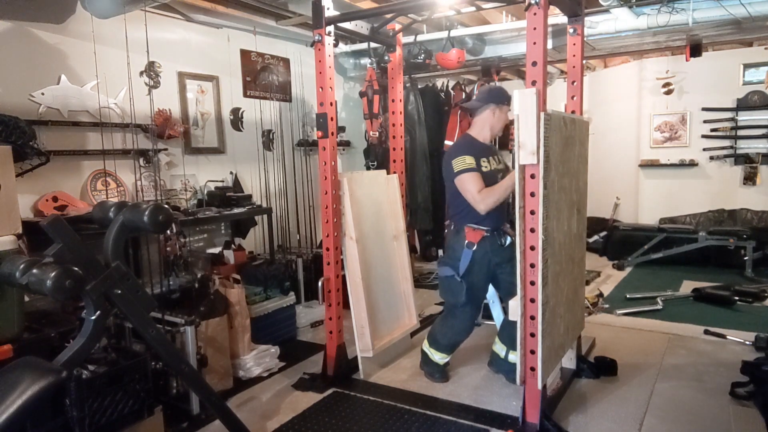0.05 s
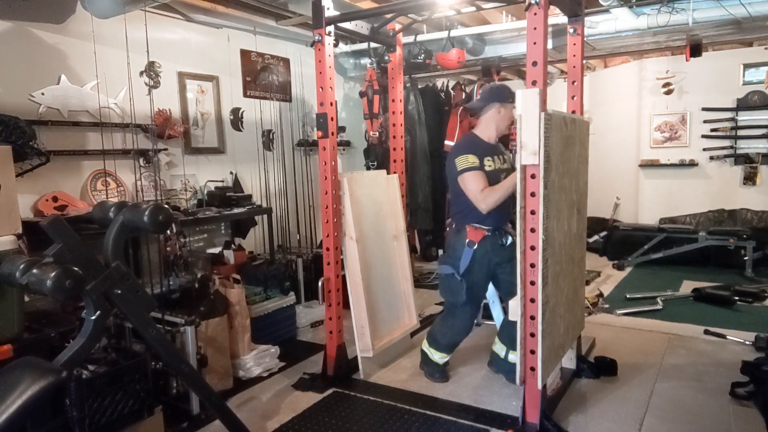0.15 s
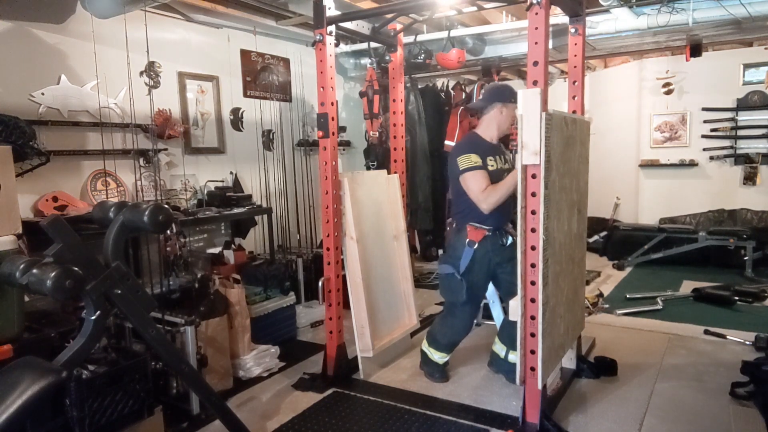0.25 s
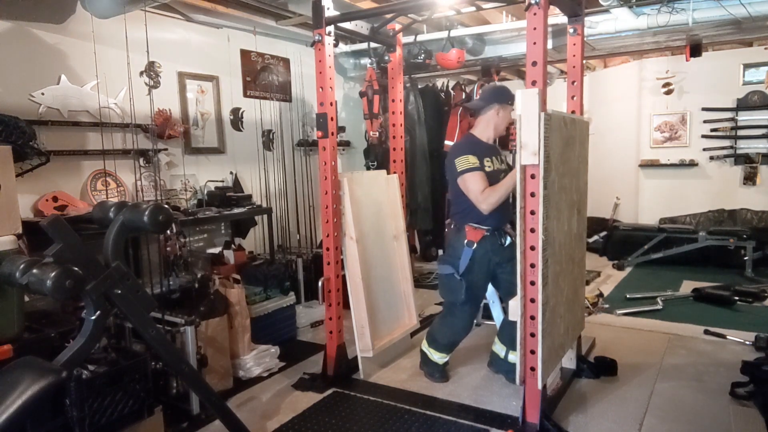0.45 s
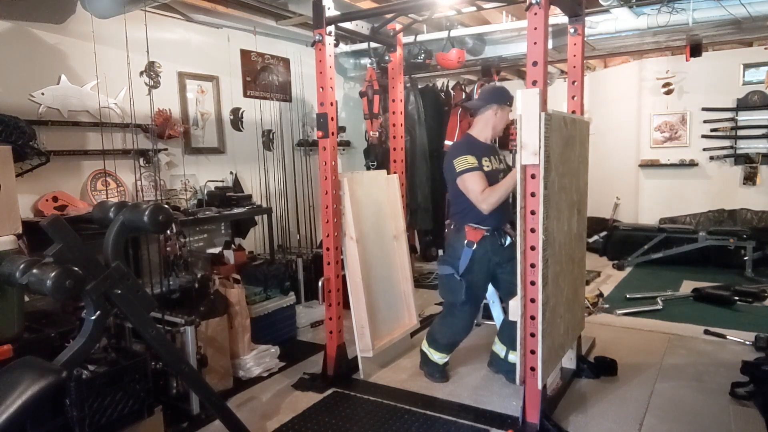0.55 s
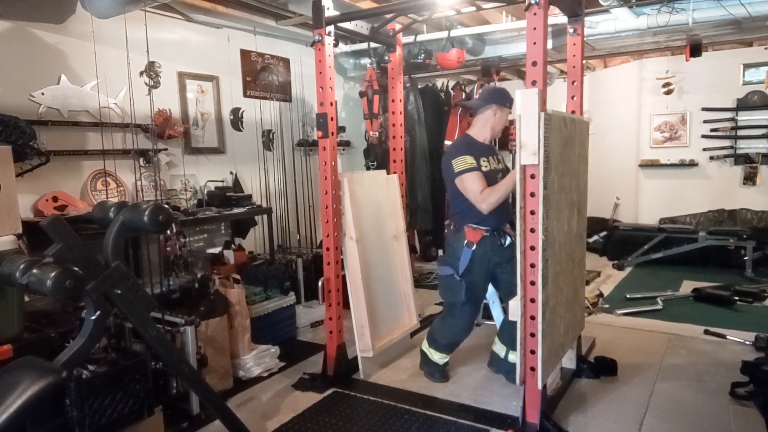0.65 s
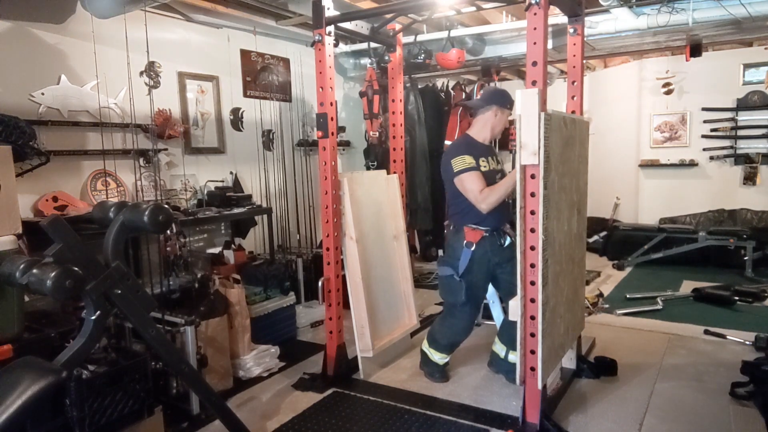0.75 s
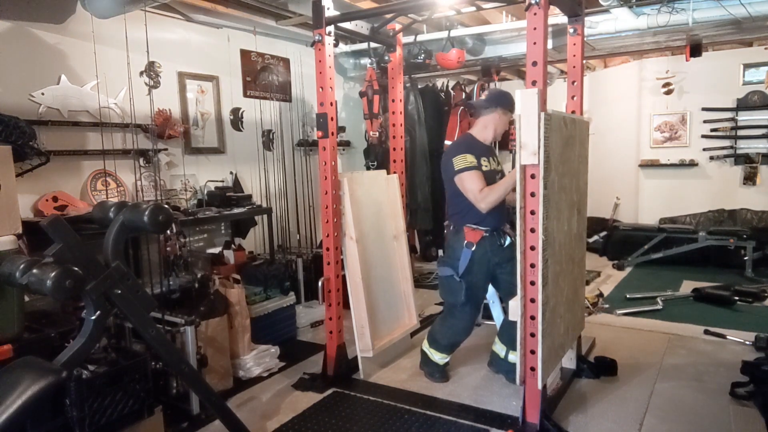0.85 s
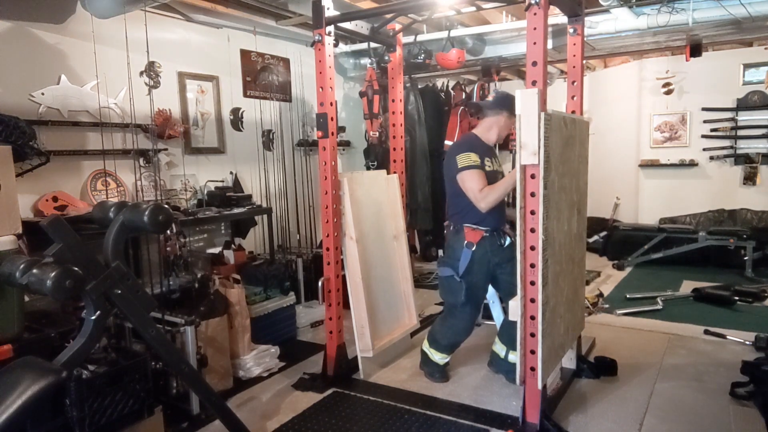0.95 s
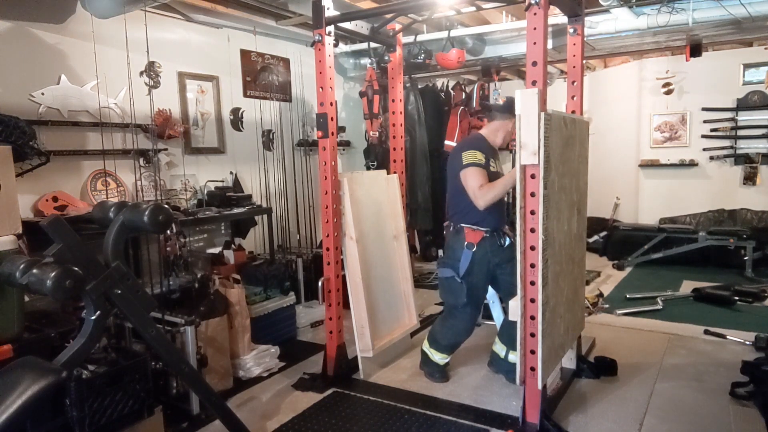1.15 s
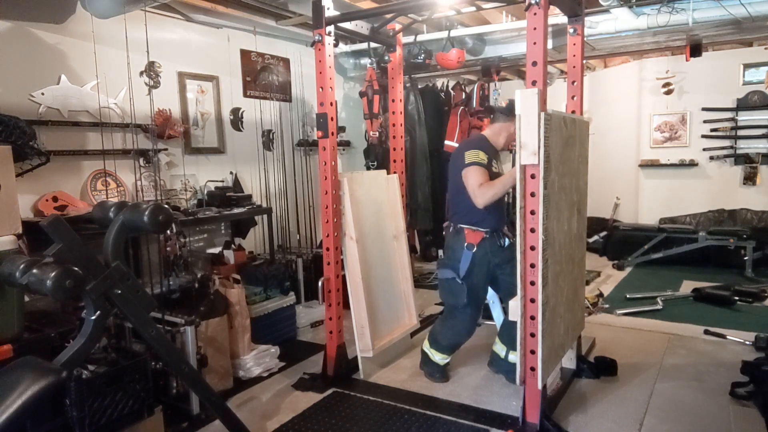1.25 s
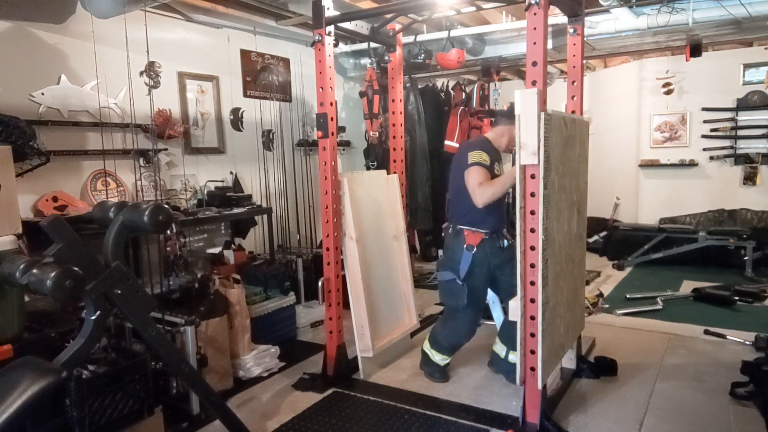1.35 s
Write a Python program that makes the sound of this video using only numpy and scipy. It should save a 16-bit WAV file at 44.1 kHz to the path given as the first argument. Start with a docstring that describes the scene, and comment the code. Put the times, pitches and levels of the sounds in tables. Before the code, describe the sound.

A wooden panel slams against a steel rack at about 0.2 seconds, a sharp crack with a short garage echo and a low floor thud, just after a faint swish of clothing. A soft bump follows at 0.4 seconds and a weaker, metallic knock near 0.6 seconds. A thin ring of loose steel then fades over faint shuffling and room noise until about 1.4 seconds.

```python
"""A wooden panel is shoved against a steel rack in a garage: it grazes, slams, bumps softly and knocks again.
Each impact excites dense, short-lived modes, heard as a crack that reverberation prolongs, and rings
the lower modes of the panel and the rack's upright. A loose steel part sings on near 1.4 kHz,
the floor thuds under shifting weight, and clothes and feet swish over faint room noise."""
import sys
import numpy as np
from scipy import signal
from scipy.fft import rfft, irfft, next_fast_len
from scipy.io import wavfile

SR = 44100
rng = np.random.default_rng(int(sys.argv[2]) if len(sys.argv) > 2 else 0)


def store_pcm(level_fs):
    """Save levels as 16-bit WAV."""
    pcm = np.round(np.clip(level_fs, -1, 1) * 32767).astype(np.int16)
    wavfile.write(sys.argv[1], SR, np.atleast_2d(pcm).T)


N = 61739
T = np.arange(N) / SR

# correlation of the two channels: frequency_hz, correlation
COHERENCE = [(150, .98), (260, 0.9), (500, .55), (1000, 0.2), (4000, 0.12), (9000, -.15)]


def amp(db):
    """Amplitude ratio of a level in decibels."""
    return 10 ** (np.asarray(db) / 20)


def curve_at(points, hz):
    """Interpolation of a table on a logarithmic frequency axis."""
    frequency, value = np.transpose(points)
    return np.interp(np.log(hz + 1), np.log(frequency + 1), value)


def add(mix, start_s, sound):
    """Superposition: a sound joins the mix at start_s."""
    part = mix[:, round(start_s * SR):]
    part += sound[:, :part.shape[1]]


def coloured(x, gain):
    """Minimum-phase filtering: a causal response of unit energy, shaped like gain(hz)."""
    size = 4096
    log_gain = np.log(gain(abs(np.fft.fftfreq(size, 1 / SR))) + 1e-5)
    response = np.exp(signal.hilbert(log_gain).conj())
    taps = np.fft.ifft(response).real[:size // 2]
    return signal.oaconvolve(x, taps[None] / np.linalg.norm(taps), axes=1)[:, :N]


def diffuse_noise(gain):
    """A diffuse field is coherent only in the bass: stereo noise of rms 1, shaped like gain(hz)."""
    size = next_fast_len(N, True)
    hz = np.fft.rfftfreq(size, 1 / SR)
    mid, side = rfft(rng.standard_normal((2, size)))
    coherence = np.clip(curve_at(COHERENCE, hz), -1, 1)
    mid, side = mid * np.sqrt(1 + coherence), side * np.sqrt(1 - coherence)
    noise = irfft(np.array([mid + side, mid - side]) * gain(hz), size)[:, :N]
    return noise / np.sqrt(np.mean(noise ** 2) + 1e-20)


def ring_modes(modes, strikes, swell_cycles=2.5, waver_depth=0.35, lag_rad=None):
    """Damped modes sum the energy of their strikes; they swell to fill the room and reflections waver them."""
    waver_hz = 24.18
    out = np.zeros((2, N))
    for hz, level_db, t60_s in modes:
        swell = 1 - np.exp(-T * hz / swell_cycles)
        envelope = (swell * amp(level_db - 60 * T / t60_s))[None]
        energy = np.zeros((1, N))
        for start_s, strike_db, treble_cut_hz in strikes:
            add(energy, start_s, (amp(strike_db) * envelope) ** 2 / (1 + (hz / treble_cut_hz) ** 6))
        coherence = np.clip(curve_at(COHERENCE, hz), -1, 1)
        lag = np.arccos(coherence) * rng.choice([-1, 1]) if lag_rad is None else lag_rad
        drift = rng.standard_normal((2, 128)) + 1j * rng.standard_normal((2, 128))
        drift[1] = coherence * drift[0] + np.sqrt(1 - coherence ** 2) * drift[1]
        waver = np.array([np.interp(T * waver_hz, np.arange(len(d)), d) for d in drift])
        tone = np.exp(2j * np.pi * (hz * T + rng.random()))
        channel_phase = np.exp(1j * np.array([[0], [lag]]))
        out += np.sqrt(energy) * ((1 + waver_depth * waver) * tone * channel_phase).real
    return out


def room_noise():
    """The noise floor: a steady diffuse field, strongest in the bass."""
    # noise spectrum: frequency_hz, density_db
    spectrum = [(15, -17.5), (25, 0.5), (50, -2), (110, -14.5), (350, -18.5), (800, -24.5), (1500, -27.5),
                (4500, -32), (7500, -40), (9500, -36.5), (15500, -37)]
    return amp(-64.5) * diffuse_noise(lambda hz: amp(curve_at(spectrum, hz)))


def swishes():
    """Friction of clothes and shuffling feet makes soft swells of broadband noise."""
    # body movements: centre_s, width_s, level_db, treble_cut_hz
    movements = [(0.025, 0.069, -59.5, 16200), (0.189, 0.031, -61, 730), (0.805, 0.12, -63.5, 396),
                 (1.39, 0.03, -70.5, 916)]
    # cloth spectrum: frequency_hz, density_db
    spectrum = [(60, -7), (150, -3), (380, -1), (700, -8.5), (1300, -9), (3300, -11), (5500, -16.5),
                (7500, -25), (10000, -19.5), (15500, -27.5)]
    out = np.zeros((2, N))
    for centre_s, width_s, level_db, treble_cut_hz in movements:
        cloth = diffuse_noise(lambda hz: amp(curve_at(spectrum, hz)) / (1 + (hz / treble_cut_hz) ** 2))
        out += amp(level_db) * cloth * np.exp(-((T - centre_s) / width_s) ** 2 / 2)
    return out


def floor_thuds():
    """Shifting weight excites the low resonances of the floor."""
    # floor modes: pitch_hz, level_db, t60_s
    modes = [(37.8, -4, .5), (50, -0.5, 0.49)]
    # shifts of weight: start_s, level_db, treble_cut_hz
    thuds = [(.232, -35, 100), (.47, -49.5, 100), (1.115, -48, 60.4)]
    return ring_modes(modes, thuds, swell_cycles=1.5, waver_depth=0.28)


def loose_steel():
    """Beating: close, lightly damped modes of a loose steel part ring on after the hard blows."""
    # steel modes: pitch_hz, level_db, t60_s
    modes = [(1333.5, -12, 2.8), (1411.7, 0, 3.1), (1487, -7, 2.2), (1561, -18, 1.3), (2837, -19, 1.5),
             (2885, -16, 1.5)]
    # jolts to the part: start_s, level_db, treble_cut_hz
    jolts = [(.214, -42, 5000), (0.573, -46, 5000)]
    return ring_modes(modes, jolts, swell_cycles=6, waver_depth=0.08, lag_rad=1.84)


def contact(bass_cut_hz, treble_cut_hz, tick_db, clack_db, crack_db):
    """Modal overlap makes an impact a noisy crack; its reverberation builds, then decays band by band."""
    # impact spectrum: frequency_hz, density_db
    spectrum = [(40, -7.5), (100, -1.5), (200, 2.5), (300, -5), (450, 1.5), (750, -1), (1200, -4.5),
                (2000, -8), (3000, -5.5), (4100, -10), (4800, -13.5), (5700, -12.5), (7500, -26),
                (11000, -29.5), (15500, -38.5)]
    # reverberation time of the garage: frequency_hz, t60_s
    reverberation = [(60, 0.46), (200, 0.57), (600, 0.34), (1500, .42), (3000, 0.35), (6000, 0.26),
                     (10000, 0.31), (15000, .33)]
    ripple_db, ripple_spacing_hz, ripple_from_hz = 4, 54.9, 1400  # peaks and dips of crowded modes
    clack_hz, clack_octaves = 1540, 0.39  # steel-on-steel contacts are stronger here
    first_share, build_s, crack_s = 0.65, 0.012, 0.01  # reflections pile up while the crack dies
    ripple = rng.standard_normal(4096)

    def colour(hz):
        """Spectral envelope: a harder contact has a higher treble cut; tick_db is the floor above it."""
        peaks = np.interp(hz / ripple_spacing_hz, np.arange(len(ripple)), ripple)
        crowded_db = ripple_db * peaks * hz / (hz + ripple_from_hz)
        clack = np.exp(-(np.log2((hz + 1) / clack_hz) / clack_octaves) ** 2 / 2)
        high_pass = 1 / (1 + (bass_cut_hz / (hz + 1)) ** 4)
        low_pass = 1 / (1 + (hz / treble_cut_hz) ** 6)
        band = np.sqrt(high_pass * (low_pass + amp(tick_db) ** 2))
        return amp(curve_at(spectrum, hz) + crowded_db + clack_db * clack) * band

    hz, t, bands = signal.stft(diffuse_noise(np.ones_like), SR, nperseg=512)
    decay = amp(-60 * t / curve_at(reverberation, hz)[:, None])
    tail = signal.istft(bands * decay, SR)[1][:, :N]
    build = 1 - (1 - first_share) * np.exp(-T / build_s)
    crack = amp(crack_db) * diffuse_noise(np.ones_like) * np.exp(-T / crack_s)
    return coloured(tail * build + crack, colour)


def panel_blows():
    """Impulse excitation: each blow cracks and rings panel and upright; soft ones spare the high modes."""
    # blows: start_s, level_db, bass_cut_hz, treble_cut_hz, tick_db, clack_db, crack_db,
    # panel_db, upright_db
    blows = [(0.1969, -27, 59, 1210, -46, -4, -4, -29.5, -63),
             (0.2, -25, 201, 7550, -44, -6.5, 0, -44, -36),
             (0.2138, -18.5, 280, 7900, -51, -3, 3.5, -21, -53),
             (.2235, -23, 294, 5340, -35, 2, 2, -42.5, -68),
             (0.4234, -33, 202, 1580, -47, 3, -6.5, -41, -55),
             (0.5714, -26, 500, 4140, -14.5, 4.5, -19, -39, -31)]
    # modes of the wooden panel: pitch_hz, level_db, t60_s
    panel_modes = [(86.6, -8, 0.31), (106.1, -9.5, .3), (138.6, -9, 0.44), (204.3, 2.5, 0.29),
                   (292.3, -10, .3), (369, -2, 0.18), (440.8, 2, 0.3), (548, -2.5, .25), (618, -0.5, 0.28),
                   (662.2, 2, 0.25), (712, -3.5, 0.29), (870, -6.5, .24), (918, -7, 0.26),
                   (2970, -7.5, .25), (3020, -9.5, 0.36), (4080, -13, 0.37)]
    # modes of the steel upright: pitch_hz, level_db, t60_s
    upright_modes = [(230.6, 5, 0.29), (435.8, 2.5, .22), (535, -8, 0.34), (602, -8, .25),
                     (790.3, -3.5, 0.33), (1148.7, -8, 0.1), (1720, -6.5, 0.39), (3160, -12, 0.39)]
    out = np.zeros((2, N))
    on_panel, on_upright = [], []
    for start_s, level_db, bass_cut_hz, treble_cut_hz, *timbre_db, panel_db, upright_db in blows:
        add(out, start_s, amp(level_db) * contact(bass_cut_hz, treble_cut_hz, *timbre_db))
        on_panel.append((start_s, panel_db, treble_cut_hz))
        on_upright.append((start_s, upright_db, treble_cut_hz))
    return out + ring_modes(panel_modes, on_panel) + ring_modes(upright_modes, on_upright)


def scene():
    """Superposition of the blows, ringing steel, thuds, swishes and room noise."""
    return panel_blows() + loose_steel() + floor_thuds() + swishes() + room_noise()


def record(dry):
    """Band limiting: a linear-phase low-pass filter removes the highest treble."""
    cutoff_hz = 15740
    taps = signal.firwin(511, cutoff_hz, window=("kaiser", 9), fs=SR)
    return signal.oaconvolve(dry, taps[None], "same")


dry = scene()
out = record(dry)
store_pcm(out)
```